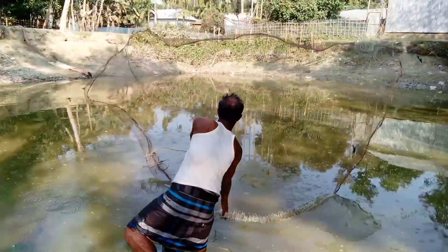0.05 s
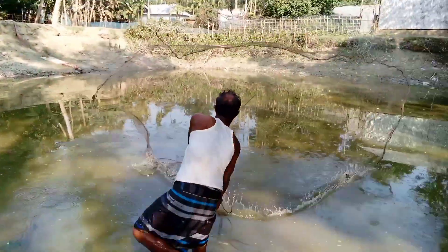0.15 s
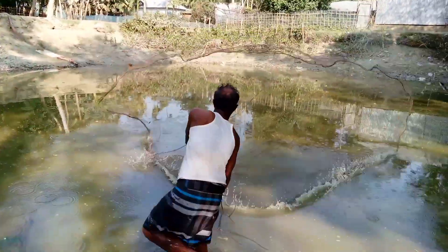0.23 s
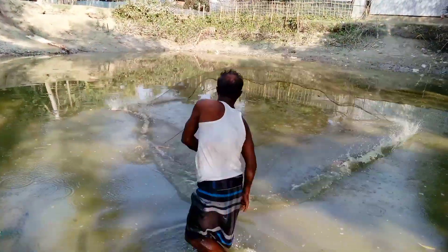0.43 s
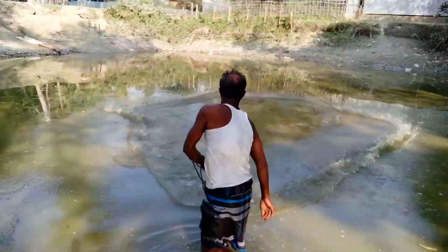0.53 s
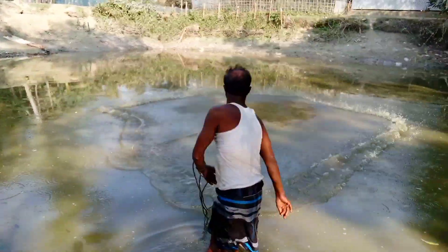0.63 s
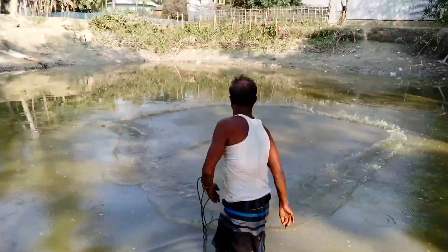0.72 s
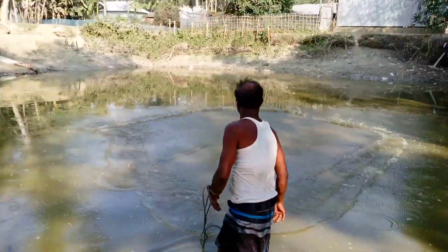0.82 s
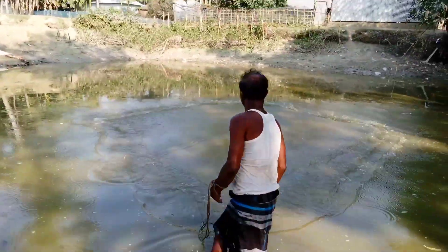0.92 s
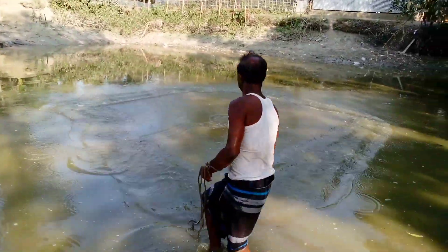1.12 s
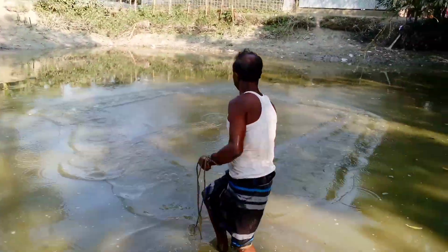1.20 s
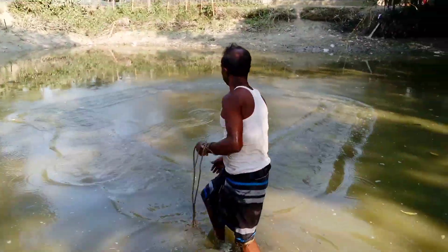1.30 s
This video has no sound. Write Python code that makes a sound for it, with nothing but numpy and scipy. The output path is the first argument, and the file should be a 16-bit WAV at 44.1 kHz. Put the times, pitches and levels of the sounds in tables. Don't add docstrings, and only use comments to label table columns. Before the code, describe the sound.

A weighted cast net splashes into a pond, gulping and popping, then settles into last bubbles

```python
import sys
import numpy as np
from scipy import signal
from scipy.fft import rfft, irfft, next_fast_len
from scipy.io import wavfile
from scipy.ndimage import uniform_filter1d

SR = 44100
rng = np.random.default_rng(int(sys.argv[2]) if len(sys.argv) > 2 else 0)


def magnitude_from_level(level_db):
    exponent = np.asarray(level_db, float) / 20
    return 10 ** exponent


def store_wav(level_fs):
    pcm = np.round(np.clip(np.atleast_2d(level_fs), -1, 1) * 32767)
    wavfile.write(sys.argv[1], SR, pcm.T.astype(np.int16))


N = 59535

PITCH_RISE = 0.087


def unit(x):
    return x / np.sqrt(np.mean(x ** 2) + 1e-20)


def hiss(spectrum, patchy_db):
    z = signal.stft(rng.standard_normal(N + 512), nperseg=256)[2]
    field = uniform_filter1d(rng.standard_normal(z.shape), 5, 0)
    field = uniform_filter1d(field, 5, 1)
    x = signal.istft(z * magnitude_from_level(patchy_db * unit(field)), nperseg=256)[1]
    size = next_fast_len(N + 8192)
    hz, db = np.transpose(spectrum)
    log_hz = np.log(np.fft.rfftfreq(size, 1 / SR) + 1)
    gain = magnitude_from_level(np.interp(log_hz, np.log(hz + 1), db, left=-120, right=-120))
    return unit(irfft(rfft(x, size) * gain, size)[:N])


def bubbles(start_s, peak_db, hz, cycles, rise, size=2048):
    columns = (start_s, peak_db, hz, cycles)
    start_s, peak_db, hz, cycles = (np.asarray(v, float)[:, None] for v in columns)
    life = np.clip(cycles, 1, None)
    peak = (start_s + 1.638 / hz) * SR
    index = np.floor(peak) - size // 4 + np.arange(size)
    cycle = (index - peak) / SR * hz
    age = cycle / life
    swell_db = -20 * (age / 0.57) ** 2
    decay_db = -20 * np.abs(age) ** 1.09
    fade_db = np.where(age > 0, decay_db, swell_db)
    phase = 2 * np.pi * cycle * (1 + rise * np.clip(age, -1, 2) / 2)
    wave = np.cos(phase) * magnitude_from_level(peak_db + fade_db)
    place = (index + size).astype(int).ravel()
    return np.bincount(place, wave.ravel(), N + 3 * size + SR)[size:size + N]


def swarm(hz, spread, cycles, size_db, count, size, tilt_db=0):
    u, g = rng.random((count, 2)), rng.standard_normal((count, 2))
    pitch = np.clip(hz * np.exp(spread * g[:, 0]), 200, 14000)
    db = -size_db * np.log(.02 + u[:, 1]) + tilt_db * np.log2(pitch / hz)
    life = cycles * np.exp(0.49 * g[:, 1])
    return unit(bubbles(u[:, 0] * N / SR, db, pitch, life, PITCH_RISE, size=size))


# time in seconds, churn level in dB, fizz over its usual share in dB.
PLUNGE = [(0.189, -60.5, -13), (0.204, -52, 3.5), (0.234, -59, 8), (0.259, -42.5, -3), (.36, -45, -2.5),
          (.39, -48.5, 1), (.45, -46.5, 0), (.63, -42.5, -3), (0.717, -46, -5), (.80, -60.5, 5),
          (.93, -64.5, 6), (1.05, -68.5, 4), (1.121, -70.5, 1.5)]
# frequency in Hz, level in dB per Hz.
WASH_SPECTRUM = [(88, -59), (150, -44), (264, -13.5), (365, 5.5), (533, 0), (714, 9.5), (989, 0.5),
                 (1110, -21), (2000, -12), (2600, -61), (4400, -120)]
FIZZ_SPECTRUM = [(900, -10), (1300, -7.5), (2000, -11), (3000, -15), (4400, -16), (5300, -33.5),
                 (7000, -36.5), (8200, -49)]
SIZZLE_SPECTRUM = [(4000, -31), (5200, -2), (7400, -5.5), (8200, -11), (12000, -16), (13500, -24),
                   (14600, -15), (15600, -18)]


def splash():
    s, churn_db, fizz_db = np.transpose(PLUNGE)
    t = np.arange(N) / SR
    level = np.interp(t, s, churn_db)
    level = level - 900 * np.clip(s[0] - t, 0, None) - 60 * np.clip(t - s[-1], 0, None)
    bright = level + np.interp(t, s, fizz_db)

    churn = magnitude_from_level(-4.5) * swarm(794.4, 0.214, 7, 4.5, count=800, size=1024)
    wash = magnitude_from_level(-2.5) * hiss(WASH_SPECTRUM, patchy_db=3.5)
    late_db = -400 * np.clip(0.274 - t, 0, None)
    gurgle_db = -9.5 + (2.08 - 2) * (level - level.max()) + late_db
    gurgle = magnitude_from_level(gurgle_db) * swarm(383, 0.12, 5.5, 4.5, count=150, size=2048)

    fizz = magnitude_from_level(-4.5) * hiss(FIZZ_SPECTRUM, patchy_db=3.5)
    droplets = magnitude_from_level(-8.5) * swarm(2186, .5, 8.2, 3.5, count=1500, size=768, tilt_db=-6)

    sizzle_db = bright.max() + 1.82 * (bright - bright.max()) - 20
    sizzle = magnitude_from_level(sizzle_db) * hiss(SIZZLE_SPECTRUM, patchy_db=1.0)
    grains = unit(uniform_filter1d(rng.standard_normal(N), size=150))
    sizzle = sizzle * magnitude_from_level(2 * grains)
    return magnitude_from_level(level) * (churn + wash + gurgle) + magnitude_from_level(bright) * (fizz + droplets) + sizzle


# start in seconds, peak in dB, pitch in Hz, life in cycles.
POCKET_BUBBLES = [(0.205, -26.5, 750, 4.8), (0.252, -34.5, 930, 3.5), (0.277, -36.5, 957, 19.6),
                  (0.295, -34, 720, 8.5), (0.31, -37, 740, 3.5), (0.331, -36.5, 940, 8.1),
                  (0.428, -36, 890, 5.8), (0.443, -33, 860, 3.3), (0.487, -22, 775, 3.9),
                  (0.502, -31.5, 730, 4.7), (0.522, -27, 857, 1.65), (0.54, -32.5, 685, 5.8),
                  (0.563, -27, 756, 3.9), (0.584, -33, 927, 5.3), (0.618, -21.5, 870, 3.4),
                  (0.631, -29, 680, 4.9), (0.644, -37.5, 883, 2), (0.661, -31, 751, 10.2),
                  (0.687, -29.5, 755, 3.5), (0.71, -37.5, 704, 4.3), (0.744, -32, 730, 6.8),
                  (0.764, -38.5, 885, 7.1), (0.781, -39, 894, 16), (0.813, -42, 806, 6.7),
                  (0.864, -45.5, 740, 1.9), (0.885, -46, 838, 12), (0.899, -45, 940, 5.7),
                  (1.007, -45.5, 1020, 6.2), (.216, -44, 596, 21), (0.22, -42, 1200, 5.7),
                  (.262, -40, 1010, 11), (0.31, -38, 1340, 7.3), (0.335, -36.5, 1250, 12),
                  (0.347, -45, 1310, 12), (.343, -43, 920, 6.5), (0.362, -40.5, 950, 7.2),
                  (.369, -38.5, 700, 12.4), (0.373, -44, 1320, 6.6), (.394, -38.5, 627, 4.4),
                  (0.419, -39, 910, 4.8), (.452, -35, 850, 4.5), (.495, -34, 1003, 11),
                  (.505, -27.5, 960, 2.1), (.528, -38, 690, 3.3), (.573, -37.5, 620, 6.3),
                  (0.6558, -37, 1240, 6), (0.674, -45, 940, 6), (0.985, -50.5, 1033, 15),
                  (1.010, -53.5, 1057, 28.4)]
GULP_BUBBLES = [(0.254, -35, 466, 4.3), (0.297, -39.5, 280, 8.6), (0.32, -38, 372, 6.3),
                (0.416, -35.5, 437, 15.7), (0.456, -42.5, 267.6, 6.9), (0.527, -39, 429, 12),
                (0.5876, -25, 374, 3.54), (0.616, -30.5, 273, 2.46), (0.66, -50, 492, 17),
                (0.736, -43, 424, 3.7), (0.78, -60, 500, 25), (0.826, -48.5, 453, 8),
                (.272, -43.5, 323, 5.7), (0.391, -41, 363, 5.9), (.436, -39.5, 414, 3),
                (0.495, -40, 439, 7.5), (0.564, -45, 390, 3.7), (.695, -42, 489, 13)]
PLINK_BUBBLES = [(0.207, -56.5, 7300, 20), (0.299, -43, 3600, 28), (0.465, -47.5, 3750, 22),
                 (0.565, -42.5, 6370, 3.8), (0.576, -41.5, 5380, 10), (0.629, -56, 4250, 5.1),
                 (0.642, -45, 6800, 6.8), (0.6919, -43, 6800, 7.7), (0.6908, -47, 4500, 9.4),
                 (0.696, -47, 2130, 1.6), (.7670, -42, 1975, 20), (1.155, -54, 6550, 7.1),
                 (1.18, -54.5, 2425, 21), (.744, -43, 1420, 3.2), (.750, -51, 2570, 11),
                 (0.768, -53, 2590, 33), (0.785, -48, 1800, 14), (.785, -60.5, 6100, 20),
                 (0.795, -61, 1320, 6.4), (0.809, -65, 6000, 24), (.814, -56, 2600, 10),
                 (0.863, -55, 2800, 22), (.888, -58.5, 3700, 18), (.895, -53.5, 1547, 16),
                 (0.919, -55, 1327, 15), (.930, -59, 1910, 14), (0.943, -66, 2660, 44),
                 (.141, -58.5, 2870, 20), (.167, -59, 2640, 12), (.187, -51, 2560, 7.6)]
LAST_BUBBLES = [(.730, -59, 640, 8.3), (.785, -42.5, 910, 24), (.848, -54.5, 654, 31),
                (.862, -50.5, 707, 20), (.880, -53.5, 817, 21), (.762, -44, 762, 10),
                (.908, -47.5, 880, 9.1), (0.927, -58, 440, 13)]


def pockets():
    plunge = np.concatenate([POCKET_BUBBLES, GULP_BUBBLES, PLINK_BUBBLES])
    popping = bubbles(*np.transpose(plunge), PITCH_RISE, size=4096)
    settling = bubbles(*np.transpose(LAST_BUBBLES), 0.17, size=6144)
    return popping + settling


SNAP_START_S = [.2055, .5765, .5850, .6170, .6230, .6285, .6912]
# peak in dB, decay in seconds.
SNAP_SHAPES = [(-61, 0.0025), (-34.5, 0.0018), (-36.5, 0.0025), (-30, 0.0029), (-39, 0.0062), (-27, 0.0011),
               (-31, 0.0022)]
# start in seconds, length in seconds, level in dB.
SPRAY_SHOWERS = [(.133, 0.023, -57), (.154, 0.027, -55), (.178, 0.0243, -64)]
TRICKLE_SHOWERS = [(1.137, 0.016, -64.5), (1.158, 0.028, -58.5)]
SPIT_SHOWERS = [(.211, 0.0071, -62.5), (.340, .004, -63), (.460, 0.0037, -64), (.505, .012, -67),
                (.571, .008, -63), (.624, .022, -57.5), (.744, 0.0036, -66), (.779, .006, -74)]
# frequency in Hz, level in dB per Hz.
SNAP_SPECTRUM = [(300, -28.5), (1500, 15.5), (4500, 9.5), (7500, -11), (9000, -6.5), (15500, -23)]
SPRAY_SPECTRUM = [(1200, -11), (1800, -6), (3000, -1), (4300, -8), (5000, -14), (7000, -11), (11500, -25),
                  (13000, -47)]
TRICKLE_SPECTRUM = [(1800, -37), (2500, -2.5), (3100, -0.5), (3900, 3), (5000, -9), (6100, 1), (7800, -22),
                    (14000, -40)]
SPIT_SPECTRUM = [(3000, -9), (6000, 5), (12000, -12), (15600, -12)]


def shower(rows):
    t = np.arange(N) / SR
    level = np.zeros(N)
    for start_s, length_s, db in rows:
        age = np.clip(t - start_s, 0, None)
        arch = np.sin(np.pi * np.minimum(age / length_s, 1)) ** 0.33
        level += magnitude_from_level(db) * arch * (age < length_s)
    return level


def drops():
    t = np.arange(N) / SR
    snap = np.zeros(N)
    for start_s, (db, decay_s) in zip(SNAP_START_S, SNAP_SHAPES):
        age = np.clip(t - start_s, 0, None)
        attack = 1 - np.exp(-age / 0.00051)
        snap += magnitude_from_level(db - 3.5) * attack * np.exp(-age / max(decay_s, 1e-4))
    out = snap * hiss(SNAP_SPECTRUM, patchy_db=-0.5)
    out += shower(SPRAY_SHOWERS) * hiss(SPRAY_SPECTRUM, patchy_db=3.0)
    out += shower(TRICKLE_SHOWERS) * hiss(TRICKLE_SPECTRUM, patchy_db=1.5)
    out += shower(SPIT_SHOWERS) * hiss(SPIT_SPECTRUM, patchy_db=4.0)
    return out


def banks(x):
    t60_s, dull_hz = 0.17, 3100
    t = np.arange(SR // 4) / SR
    hop = SR // 25
    padded = np.pad(x, (hop, 2 * hop))
    out = np.zeros(N + SR)
    for start in range(-hop, N, hop):
        tail = rng.standard_normal(len(t)) * magnitude_from_level(-60 * t / t60_s) * (t > .004)
        tail = signal.lfilter([1], [1, -np.exp(-2 * np.pi * dull_hz / SR)], tail)
        piece = padded[start + hop:][:2 * hop] * np.hanning(2 * hop)
        echo = signal.fftconvolve(piece, tail / np.linalg.norm(tail))
        out[start + hop:][:len(echo)] += echo
    return out[hop:hop + N]


# start in seconds, peak in dB, pitch in Hz.
PUMP_THUDS = [(0.023, -58.5, 103), (0.1, -63, 112), (0.166, -60.5, 114), (0.221, -56.5, 76),
              (0.299, -58, 151), (0.34, -56, 86), (0.394, -51.5, 66), (0.448, -58, 110), (0.51, -53, 72),
              (0.6, -70, 146), (0.652, -60, 126), (0.749, -56.5, 99), (0.791, -53, 80.5),
              (0.862, -55.5, 99), (0.942, -55, 99), (1.01, -65, 133), (1.082, -56, 92.4), (1.151, -57, 100),
              (1.222, -57.5, 95.3), (1.289, -60, 102)]
# frequency in Hz, level in dB per Hz.
RUMBLE_SPECTRUM = [(25, -27), (55, -10.5), (100, -5), (160, -17), (300, -36)]


def pump():
    s, db, hz = np.transpose(PUMP_THUDS)
    thuds = bubbles(s, db, hz, np.full(len(s), 2.3), 0, size=4096)
    return thuds + magnitude_from_level(-71.5) * hiss(RUMBLE_SPECTRUM, patchy_db=4.0)


# frequency in Hz, level in dB per Hz.
AIR_SPECTRUM = [(150, -5), (380, -3), (550, -13.5), (900, -3.5), (2300, -15), (6800, -25.5), (8500, -36.5),
                (15650, -33.5)]


def air():
    return magnitude_from_level(-69.5) * hiss(AIR_SPECTRUM, patchy_db=1)


def scene():
    water = splash() + pockets() + drops()
    mix = water + magnitude_from_level(-11.5) * banks(water) + pump() + air()
    return mix[None]


def low_pass(x):
    return signal.sosfilt(signal.butter(12, 15680, fs=SR, output="sos"), x)


def record(dry):
    return low_pass(dry)


dry = scene()
out = record(dry)
store_wav(out)
```